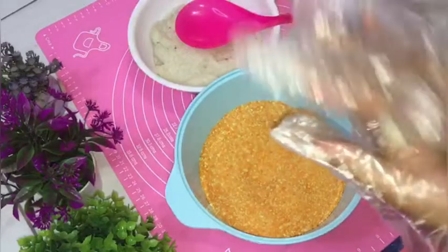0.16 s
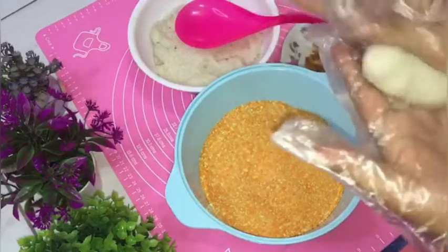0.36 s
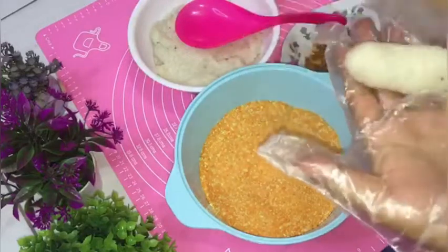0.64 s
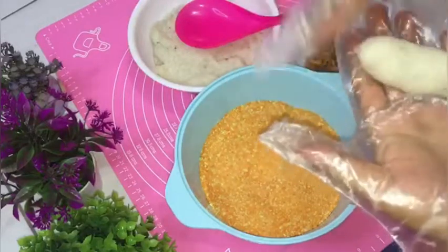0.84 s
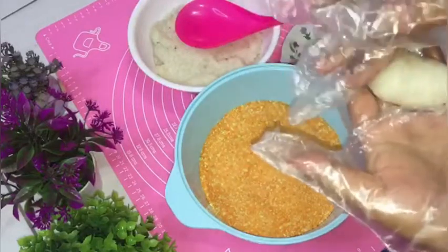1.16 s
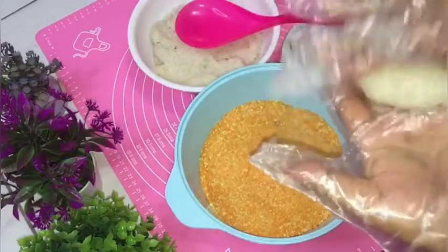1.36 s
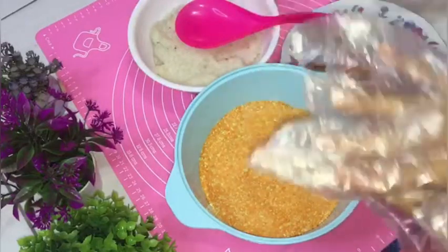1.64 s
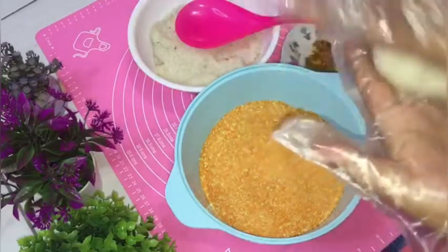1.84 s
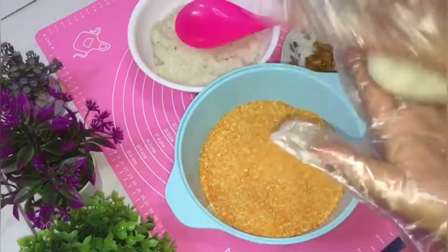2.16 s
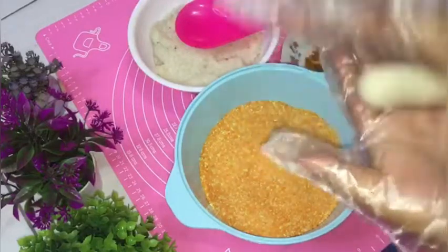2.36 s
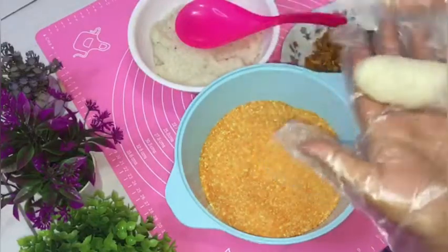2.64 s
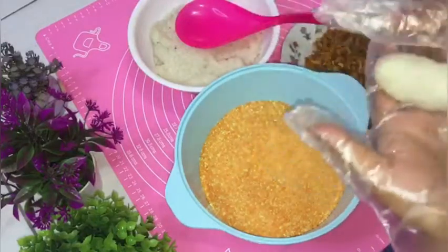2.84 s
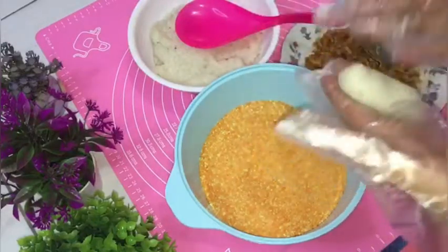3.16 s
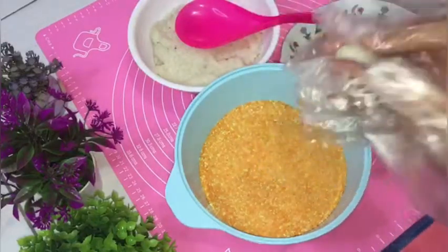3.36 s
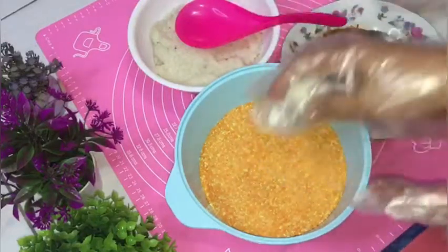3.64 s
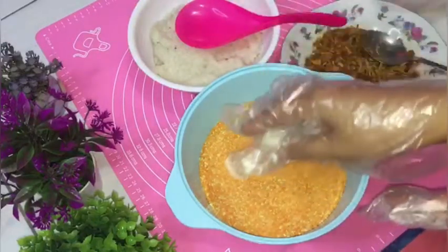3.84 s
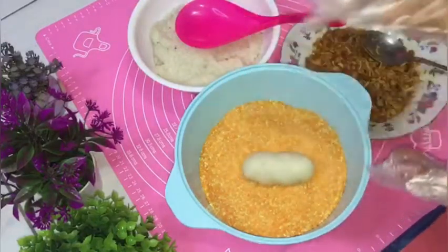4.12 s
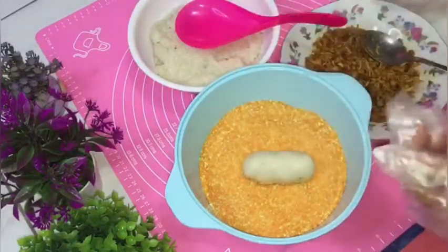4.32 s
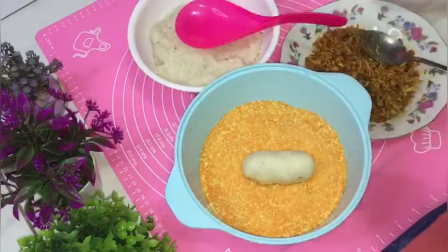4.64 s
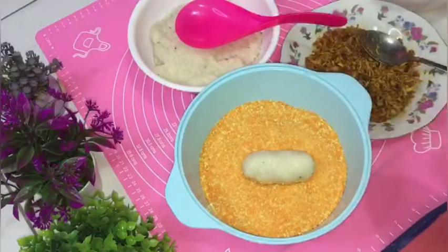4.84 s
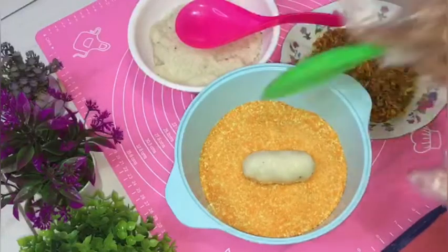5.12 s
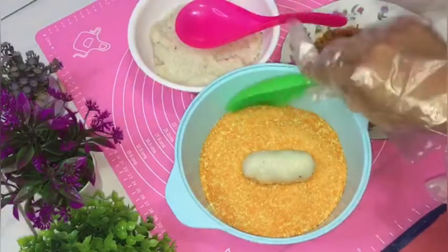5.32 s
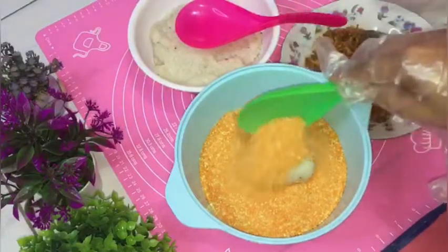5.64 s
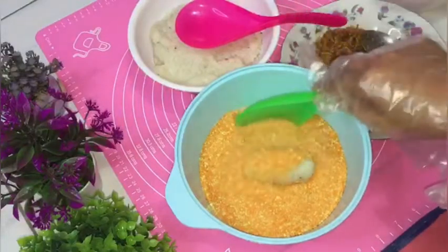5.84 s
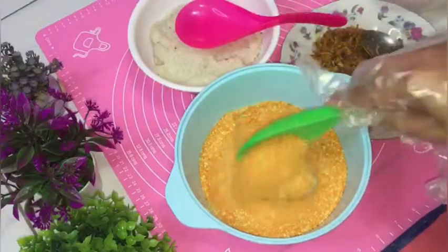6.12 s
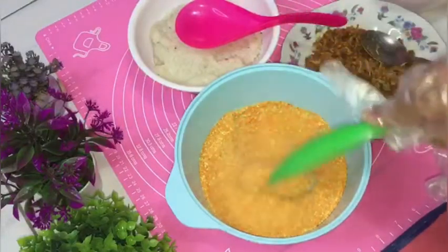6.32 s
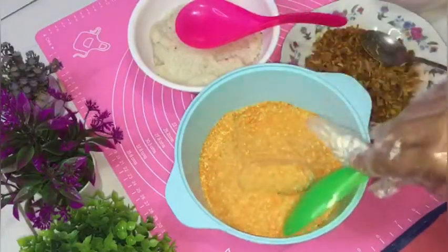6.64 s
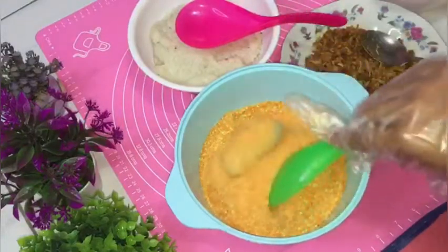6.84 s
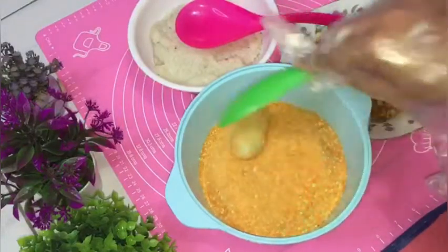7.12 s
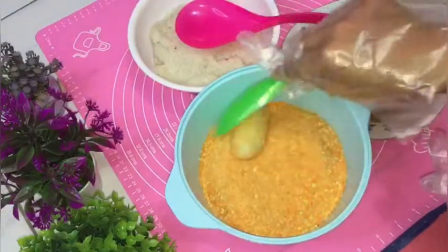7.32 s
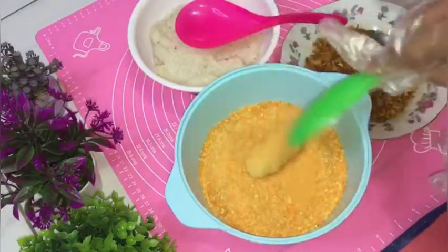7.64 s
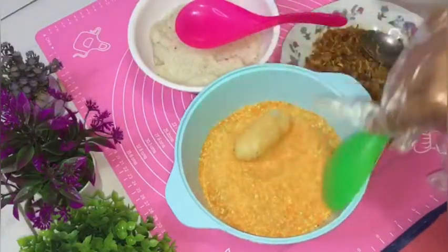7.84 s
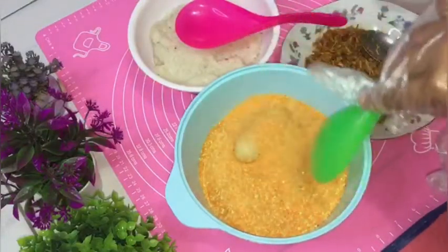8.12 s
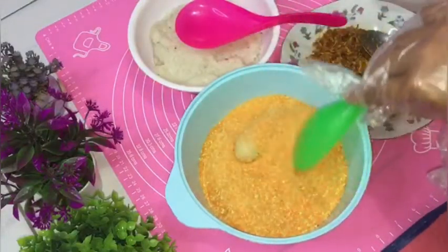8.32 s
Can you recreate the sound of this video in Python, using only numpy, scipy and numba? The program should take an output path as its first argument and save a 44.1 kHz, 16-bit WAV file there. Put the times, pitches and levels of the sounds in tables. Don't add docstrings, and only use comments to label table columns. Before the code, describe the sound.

A close microphone in a small, fairly dry kitchen picks up thin plastic gloves rolling a rice ball. From 0 to 0.7 s the film crackles in quick, dense strokes with sharp dry snaps; it eases into lighter rustling, with a slap near 1.35 and a longer peel at 1.6. Vigorous rubbing returns from 1.7 to 2.9 s, bright on top with soft hollow pats below. Rustles thin after 3.1, with tiny tugs around 3.7 and near quiet at 3.8 to 4.1. Light crinkling resumes from 4.2 to 5.3. A bright spoon knock on the plastic bowl at 5.3 begins gritty dragging through crumbs. Another hard knock comes at 6.6 with a longer rattling scrape, then sparse faint film ticks, a small dig at 7.3, a tight double knock at 7.9 and a light one at 8.25. Faint air, fan and wavering motor hum continue throughout.

```python
import sys
import numpy as np
from scipy import signal
from scipy.fft import rfft, irfft
from scipy.io import wavfile
from scipy.ndimage import map_coordinates
from numba import njit

SR = 44100
rng = np.random.default_rng(int(sys.argv[2]) if len(sys.argv) > 2 else 0)


def gain_from_db(level_db):
    decades = np.asarray(level_db, float) / 20
    return 10 ** decades


def generate_wav(signal):
    frames = np.transpose(np.atleast_2d(signal))
    scaled = np.clip(frames, -1, 1) * 32767
    pcm = np.round(scaled).astype(np.int16)
    wavfile.write(sys.argv[1], SR, pcm)


N = 373968


def gloves():
    # frequency in Hz, level in dB per Hz.
    creases = [(1470, -32), (2500, -3), (4110, -1.5), (4920, -1), (5320, 0.5), (8690, -3), (11200, -2.5),
               (11700, -38), (15200, -35), (22000, -120)]
    broad_folds = [(350, -39), (600, -17.5), (2260, -9), (2800, -10), (3640, -31), (6160, -120)]
    palm_hollow = [(110, -34), (180, 7.5), (242, 4.5), (393, 12), (600, 2.5), (780, -39), (1320, -120)]
    fine_db = rubbing(0, 0)
    folds_db = rubbing(-10, 0.99)
    palms_db = rubbing(-23, 1.2)
    fine = crackle(creases, 2466, 12470, fine_db, per_s=11000,
                   uneven_db=1.2, cycles=9.3, clump_db=0.8, patch_db=2.0)
    folds = crackle(broad_folds, 660, 2570, folds_db, per_s=5000,
                    uneven_db=1.5, cycles=10.1, clump_db=0.6, patch_db=2.7)
    palms = crackle(palm_hollow, 165.4, 726, palms_db, per_s=900,
                    uneven_db=2.2, cycles=12.7, clump_db=1.8, patch_db=3)
    ticks = crackle(creases, 3300, 10000, fine_db - 13.0, per_s=600,
                    uneven_db=3.3, cycles=2.2, clump_db=2.8, patch_db=1.3)
    return fine + folds + palms + ticks


def rubbing(offset_db, follow):
    # time in seconds, creases in dB, hold in seconds, pressure in dB.
    rolls = [(0.026, -23.5, 0.027, -2.5), (0.075, -34, 0.017, 0), (0.145, -27, 0.07, 1),
             (0.29, -25.5, 0.049, -2), (0.36, -31.5, 0.015, -2), (0.435, -26.5, 0.049, -0.5),
             (0.5, -36, 0.012, 7), (0.575, -25, 0.036, 1.5), (0.65, -25, 0.014, 3.5),
             (0.68, -32.5, 0.025, 3.5), (0.945, -30.5, 0.04, 4), (1.412, -28, 0.018, 3.5),
             (1.67, -28.5, 0.029, 2), (1.765, -28, 0.034, 0.5), (1.81, -24.5, 0.031, -2.5),
             (1.92, -29.5, 0.0078, -2.5), (1.94, -25, 0.053, 0.5), (2.085, -20.5, 0.03, -4),
             (2.16, -31.5, 0.03, -2), (2.22, -25, 0.055, 0), (2.3, -34, 0.004, 0), (2.365, -22, 0.069, 0),
             (2.56, -32.5, 0.02, -1), (2.615, -29.5, 0.072, -1.5), (2.77, -25.5, 0.028, 0),
             (2.82, -34, 0.065, -1), (2.978, -28, 0.015, -0.5), (3.035, -41, 0.01, 1),
             (3.058, -28, 0.004, 2.5)]
    shifts = [(0.736, -33.5, 0.037, 0.5), (0.82, -31.5, 0.039, -0.5), (1.046, -35.5, 0.05, 2),
              (1.16, -35.5, 0.12, 2.5), (1.48, -38.5, 0.052, 2.5), (3.107, -34, .12, 1),
              (3.269, -28.5, 0.035, -1), (3.36, -31, 0.049, 1), (3.44, -32.5, 0.11, 0.5),
              (3.598, -38.5, 0.06, -1), (3.84, -56.5, 0.0074, -2), (3.906, -27.5, 0.0067, 3),
              (4.0, -41.5, 0.023, 0.5), (4.125, -46.5, .01, -1), (4.207, -31, 0.08, -4),
              (4.329, -32.5, 0.098, -2.5), (4.47, -32, 0.056, 0), (4.545, -30.5, 0.063, 1.5),
              (4.67, -27, 0.011, 0), (4.72, -33.5, 0.092, 1.5), (4.814, -38, 0.025, 7),
              (4.872, -30, 0.046, 2.5), (4.97, -30, 0.058, -2.5), (5.063, -30.5, 0.04, -0.5),
              (5.14, -29.5, 0.065, -2), (5.247, -34.5, 0.12, -2)]
    slaps = [
        (1.343, -27, 0.019, 4.5),
        (1.577, -25.5, 0.089, 0),
        (2.462, -28, 0.028, 1.5),
        (2.892, -30.5, 0.0039, 3.5),
        (3.702, -38.5, 0.012, -1),
        (3.728, -35, 0.005, -2),
        (3.743, -37.5, 0.0061, 2.5),
        (3.772, -31.5, 0.005, -1.5),
        (3.953, -40, 0.007, -2),
    ]
    power = 0
    # rise, sag and fall in dB per s
    for rows, rates in [(rolls, (307, 6.9, 280)), (shifts, (225, 7.9, 244)), (slaps, (1050, 5.6, 640))]:
        s, db, hold, press = np.transpose(rows)
        power = power + strokes(s, db + offset_db + follow * press, hold, *rates)
    return in_db(power)


def strokes(start_s, peak_db, hold_s, rise, sag, fall):
    t = np.arange(N // 20 + 2) * 20 / SR
    power = np.zeros(len(t))
    for s, db, hold in zip(start_s, peak_db, hold_s):
        since = t - s
        swell_db = rise * np.minimum(since, 0)
        sag_db = sag * np.clip(since, 0, hold)
        fall_db = fall * np.maximum(since - hold, 0)
        power += gain_from_db(2 * (db + swell_db - sag_db - fall_db))
    return np.interp(np.arange(N) / SR, t, power)


def in_db(power):
    return 10 * np.log10(power + 1e-9)


def crackle(spectrum, low_hz, high_hz, level_db, per_s, uneven_db, cycles, clump_db, patch_db):
    density = np.clip(gain_from_db(0.49 * (level_db - level_db.max() + 12.0)), 0.03, 1)
    rate = per_s * density * (level_db > -85)
    at = np.flatnonzero(rng.random(N) < rate / SR)
    place, spread, sign, length = rng.random((N, 4))[at].T
    hz = low_hz * (high_hz / low_hz) ** place
    patch_map = rng.standard_normal((21, N // 2000 + 2))
    patches = map_coordinates(patch_map, [20 * place, at / 2000], order=1)
    size_db = at_hz(spectrum, hz) - uneven_db * np.log(spread + 0.035)
    size_db = size_db + clump_db * drift(26)[at] + patch_db * patches
    size = gain_from_db(size_db) * hz * np.sign(sign - 0.5) / np.sqrt(rate[at])
    out = np.zeros(N)
    add_snaps(out, at, hz, size, cycles * (0.5 + length), SR)
    return gain_from_db(level_db) * out / np.sqrt(np.mean(out[rate > 0] ** 2))


@njit
def add_snaps(out, at, hz, size, cycles, sr):
    for k in range(len(at)):
        w = 2 * np.pi * hz[k] / sr
        r = 10 ** (-3 * hz[k] / (cycles[k] * sr))
        old, new = 0., size[k]
        for i in range(at[k], min(at[k] + int(cycles[k] * sr / hz[k]), len(out))):
            out[i] += new - old
            old, new = new, 2 * r * np.cos(w) * new - r * r * old


def at_hz(points, hz):
    point_hz, point_db = np.transpose(points)
    return np.interp(np.log(np.minimum(hz, 11500)), np.log(point_hz), point_db)


def drift(rate):
    r = np.exp(-80 * np.pi * rate / SR)
    slow = signal.lfilter([1], [1, -2 * r, r * r], rng.standard_normal(N // 40 + 2002))[2000:]
    return np.interp(np.arange(N) / 40, np.arange(len(slow)), rms_one(slow))


def rms_one(x):
    return x / np.sqrt(np.mean(x ** 2) + 1e-20)


def cracks():
    # time in seconds, peak in dB.
    creases_letting_go = [(0.2897, -4), (0.3213, -3), (0.5765, -2), (0.601, -8), (1.604, -3),
                          (1.6375, -3.5), (1.661, -6), (1.835, -5), (2.105, -3), (2.371, -5), (2.77, -4),
                          (2.78, -6), (3.907, -6), (5.7263, -21), (5.772, -25), (6.2335, -12),
                          (6.3392, -16), (7.1836, -23), (7.3108, -11)]
    s, peak_db = np.transpose(creases_letting_go)
    clicks = np.zeros(N)
    clicks[np.round(s * SR).astype(int)] = gain_from_db(peak_db - 11.5)
    hiss = signal.lfilter([1], [1, -gain_from_db(-60 / (0.022 * SR))], clicks) * rng.standard_normal(N)
    return signal.sosfilt(signal.butter(2, 3500, "high", fs=SR, output="sos"), clicks + 0.46 * hiss)


def spikes():
    # time in seconds, peak in dB.
    buckles = [(0.7811, -23.4), (0.8716, -22.9), (1.1367, -24.8), (1.2111, -24.2), (1.5552, -26.2),
               (1.9367, -11.1), (2.303, -12.1), (2.7274, -23.9), (2.9217, -23.3), (3.0319, -19.9),
               (3.3136, -17.4), (3.5434, -19.8), (3.5829, -25.2), (3.7039, -26.3), (3.7291, -26.3),
               (3.7435, -22.9), (3.7722, -21.3), (3.8037, -31.9), (3.9551, -23.5), (4.1223, -32.6),
               (4.3937, -20.2), (4.4637, -21.3), (4.6203, -19.6), (4.6773, -16.2), (4.7797, -19.0),
               (5.3019, -22.5), (5.6664, -43.0), (5.7263, -34.7), (5.7465, -40.7), (5.7718, -35.0),
               (5.7934, -30.9), (6.1303, -34.9), (6.1688, -36.0), (6.2247, -33.3), (6.2336, -21.8),
               (6.2766, -41.9), (6.2976, -40.5), (6.3095, -35.8), (6.34, -29.6), (6.3996, -27.4),
               (6.4591, -29.5), (6.5392, -23.4), (6.7029, -21.1), (6.8763, -25.2), (6.9241, -29.7),
               (6.9688, -27.0), (7.0338, -38.9), (7.0509, -44.7), (7.1219, -44.0), (7.1437, -43.9),
               (7.1873, -39.0), (7.3549, -25.1), (7.7269, -26.3), (7.771, -29.7), (7.7871, -25.5),
               (7.8229, -35.3), (8.0977, -30.5), (8.215, -41.4), (8.3682, -28.7), (8.4122, -35.6)]
    s, peak_db = np.transpose(buckles)
    clicks = np.zeros(N)
    clicks[np.round(s * SR).astype(int)] = gain_from_db(peak_db + 6) * (-1) ** np.arange(len(s))
    return signal.sosfilt(signal.butter(2, 2400, "high", fs=SR, output="sos"), clicks)


def film_snaps():
    # time in seconds, peak
    # in dB, pitch in Hz.
    hand_snaps = [(0.1291, -9, 9150), (0.2887, -13, 10100), (1.1273, -36, 4260), (1.1558, -20, 8770),
                  (1.3421, -20, 3740), (1.5744, -20, 6100), (2.9667, -11.5, 5500), (3.7703, -22, 5750),
                  (4.1165, -27, 6880), (4.1609, -30, 5710), (4.1914, -22, 7100), (4.78, -14, 9500),
                  (4.7785, -18, 2700),
                  (5.7245, -25, 10850), (5.7704, -28, 8800), (5.7922, -33, 6100), (5.665, -41.5, 2330),
                    (6.106, -37, 3560), (6.129, -34, 4600), (6.308, -41, 2250), (6.588, -23, 9940),
                    (6.876, -25, 8500), (6.9213, -25, 2970), (6.924, -25, 9000), (7.146, -39.5, 5500),
                    (7.0922, -41, 5910), (7.513, -32, 2600), (7.771, -29, 6330), (6.128, -26, 11030),
                    (6.225, -28, 5200), (6.155, -33, 5000), (6.2333, -21, 8380), (6.2966, -36, 2800),
                    (6.3375, -21, 10650), (6.362, -37, 4220), (6.3996, -24, 6920), (6.538, -30, 3330),
                    (6.969, -31, 3780), (7.0324, -34, 5840), (7.1204, -43, 5230), (7.1426, -43, 8950),
                    (7.184, -31, 8700), (7.2863, -50, 2285), (7.645, -35, 6450), (7.786, -18, 9200),
                    (8.2737, -40, 2466), (8.367, -33, 3150)]
    return lone(hand_snaps, 19.0, -2.1)


def pats():
    # time in seconds, peak in dB, pitch in Hz.
    presses = [(0.435, -51, 288), (0.646, -29.5, 437), (1.35, -46, 328), (1.62, -31, 360),
               (2.09, -26.5, 311.4), (2.888, -40.5, 316), (4.56, -34, 623), (4.68, -37, 586),
               (4.812, -31.5, 557), (4.885, -33, 620), (5.324, -36.5, 315), (6.567, -32, 343),
               (7.876, -31, 450)]
    return lone(presses, 22.4, -0.38)


def lone(events, cycles, trim_db):
    out = np.zeros(N)
    for s, peak_db, hz in events:
        at = round(s * SR)
        t = np.arange(int(cycles / hz * SR)) / SR
        onset = np.minimum(t * hz / 0.38, 1)
        wave = gain_from_db(peak_db + trim_db - 60 * t * hz / cycles) * np.sin(2 * np.pi * hz * t) * onset
        out[at:at + len(t)] += wave[:N - at]
    return out


def knocks():
    # time in seconds, peak in dB, brightness in dB per octave.
    blows = [
        (5.325, -1, 10.5),
        (5.344, -23, -5),
        (5.808, -35, 3),
        (6.569, -1.5, 5.5),
        (7.311, -42, -5.5),
        (7.871, 1, 6),
        (7.881, -0.5, 6.5),
        (8.251, -12.5, 0.5),
    ]
    # frequency in Hz, level in dB, 60 dB decay in seconds.
    bowl_modes = [(480, -43, 0.022), (820, -10, 0.011), (1560, -12.5, 0.012), (2210, -13, 0.0073),
                  (3940, -26.5, 0.0083), (4300, -48, .006), (5830, -31, 0.004), (7240, -45, .004)]
    s, peak_db, bright_db = np.transpose(blows)
    at = np.round((s - 0.0008) * SR).astype(int)
    scatter_db = rng.normal(0, 0.74, (len(s), len(bowl_modes)))
    out = 0
    for k, (hz, level_db, t60) in enumerate(bowl_modes):
        clicks = np.zeros(N)
        clicks[at] = gain_from_db(peak_db + level_db + bright_db * np.log2(hz / 2000) + scatter_db[:, k])
        out = out + (-1) ** k * ring(clicks, hz, t60)
    out = 0.37 * out + np.roll(out, int(0.000916 * SR))
    return signal.sosfilt(signal.butter(2, [500, 6000], "band", fs=SR, output="sos"), out)


def ring(clicks, hz, t60):
    r, w = gain_from_db(-60 / (t60 * SR)), 2 * np.pi * hz / SR
    return signal.lfilter([0, np.sin(w)], [1, -2 * r * np.cos(w), r * r], clicks + 1e-18)


def spoon():
    # frequency in Hz, level in dB per Hz.
    rattle = [(150, -44), (250, -22), (296, -4.5), (334, -10.5), (619, -10), (674, -8.5), (1000, -5),
              (1440, -0.5), (1730, -3), (2230, -1.5), (3060, -6.5), (4500, -4), (5850, -35), (9900, -120)]
    crumb_grain = [(2060, -27), (3500, 0.5), (9140, -7.5), (10600, 2), (11200, -4), (11700, -32),
                   (15200, -36), (22000, -120)]
    # frequency in Hz, width in Hz, gain in dB.
    wall_modes = [(870, 300, -4.5), (1565, 88, 4), (2240, 65, -10), (2600, 65, -3.5)]
    rim_db = digging(sag=56)
    floor_db = digging(sag=56, floor=0.78)
    crumbs_db = digging(sag=35, crumbs=0.88)
    rim = crackle(rattle, 1690, 3750, rim_db - 2.0, per_s=5000,
                  uneven_db=1.0, cycles=35.0, clump_db=0.46, patch_db=3)
    floor = crackle(rattle, 285, 1458, floor_db - 3.0, per_s=2500,
                    uneven_db=0.87, cycles=42.0, clump_db=0.97, patch_db=0.93)
    crumbs = crackle(crumb_grain, 3770, 10280, crumbs_db, per_s=11000,
                     uneven_db=3.2, cycles=7.2, clump_db=0.61, patch_db=1.8)
    ticks = crackle(crumb_grain, 4000, 8300, crumbs_db - 19.5, per_s=640,
                    uneven_db=1.1, cycles=4.4, clump_db=1.5, patch_db=1.2)
    modes = 0
    for hz, width_hz, gain_db in wall_modes:
        b, a = signal.iirpeak(hz, hz / width_hz, fs=SR)
        modes = modes + gain_from_db(gain_db) * signal.lfilter(b, a, rim + floor)
    return rim + floor + modes + crumbs + ticks


def digging(sag, floor=0, crumbs=0):
    # time in seconds, bowl rim in dB, drag in seconds,
    # bowl floor in relative dB, crumbs in relative dB.
    digs = [(5.344, -31, 0.043, -3, 0), (5.37, -30.5, 0.092, -5.5, 2), (5.806, -40.5, .03, -5, 8),
            (5.829, -37.5, 0.032, -1.5, 1), (6.573, -40, 0.024, 1.5, 0), (6.595, -36.5, 0.34, -3, 5),
            (7.31, -39.5, 0.029, -5, 1), (7.354, -40, 0.03, -6.5, 1), (7.883, -35, 0.12, -0.5, -2),
            (8.03, -44, 0.13, -4.5, -3), (8.255, -44.5, 0.032, 3, -6), (8.285, -44.5, 0.099, 1, 4.5)]
    # time in seconds, bowl rim
    # in dB, hold in seconds, bowl floor in relative dB, crumbs in relative dB.
    grips = [(5.575, -52, 0.039, -11, 2.5), (5.676, -61.5, 0.1, -4, 6), (5.793, -55.5, 0.0036, -22, 13.5),
             (5.906, -40, 0.026, -6, 5), (5.961, -45, 0.026, -7, 2), (6.06, -56, 0.043, -5.5, 2),
             (6.14, -56, 0.017, -24, 9.5), (6.19, -60, 0.01, -17, 17.5), (6.306, -58.5, 0.046, -17, 9),
             (6.391, -52, 0.035, -8, 12.5), (6.464, -49.5, 0.012, -7, 11), (6.54, -42.5, 0.012, -4, 7.5),
             (6.78, -44, 0.035, -7, 2), (6.865, -49.5, .05, -8, 6), (6.98, -54.5, 0.023, -4, 5),
             (7.04, -68, 0.02, -2, 12), (7.095, -68, 0.0086, -5, 13.5), (7.145, -71, 0.014, -6, 16),
             (7.186, -68, .01, -5, 11), (7.232, -70.5, 0.032, -12, 15.5), (7.454, -48.5, 0.025, -8, 4),
             (7.52, -58.5, 0.013, -1, 12), (7.55, -59, .008, -7, 9), (7.6, -61, 0.011, -15, 6),
             (7.661, -50.5, 0.1, -6, 11), (7.814, -59.5, .01, -12, 12), (7.875, -43, 0.0082, -4, 2.5),
             (8.1, -56, 0.0077, -8, 7), (8.14, -61, 0.018, -8, 10), (8.211, -64, 0.0052, -8, 6),
             (8.283, -46, 0.03, -4, -2)]
    power = 0
    for rows, rates in [(digs, (7000, sag, 185)), (grips, (384, 3.7, 280))]:
        s, db, hold, low, high = np.transpose(rows)
        power = power + strokes(s, db + floor * low + crumbs * high, hold, *rates)
    return in_db(power)


def scrapes():
    # time in seconds, level in dB, hold in seconds, pitch in Hz.
    edge_strokes = [(4.792, -36.5, 0.05, 2600), (5.52, -52, 0.11, 2210), (5.896, -44, 0.03, 2500),
                    (5.996, -55, 0.12, 2680), (6.141, -49, 0.022, 2660), (6.584, -42, 0.05, 1990),
                    (6.75, -47.5, 0.077, 2284), (7.338, -44, 0.055, 2430), (7.439, -53.5, 0.05, 2320),
                    (7.887, -44, 0.11, 2150), (8.03, -49, 0.14, 2230)]
    width_hz = 240
    rise, sag, fall = 1300, 43, 370
    noise = rng.standard_normal(N)
    out = 0
    for s, level_db, hold, hz in edge_strokes:
        band = signal.lfilter(*signal.iirpeak(hz, hz / width_hz, fs=SR), noise)
        power = strokes([s], [level_db], [hold], rise, sag, fall)
        out = out + rms_one(band) * np.sqrt(power + 1e-20)
    return out


def thuds():
    # time in seconds, peak in dB, pitch in Hz.
    table_knocks = [
        (1.13, -41, 115),
        (1.17, -44, 129),
        (2.17, -45, 148),
        (3.48, -40.5, 73),
        (5.36, -40, 146.8),
        (5.42, -43, 140),
        (2.09, -34.5, 190),
        (3.06, -40, 204),
        (4.42, -43.5, 230.7),
        (8.4, -44, 149),
    ]
    return lone(table_knocks, 24.6, 2.2)


def kitchen(x):
    t60_s = 0.17
    t = np.arange(int(0.5 * SR)) / SR
    tail = rng.standard_normal(len(t)) * gain_from_db(-60 * t / t60_s) * (t > 0.004)
    tail = signal.lfilter([1], [1, -0.4], tail)
    return signal.fftconvolve(x, tail / np.sqrt(np.sum(tail ** 2)))[:N]


def room_tone():
    # frequency in Hz, level in dB per Hz.
    air_spectrum = [(18, -39), (30, -2), (86, 8), (165, 0), (252, -7.5), (686, -14), (1530, -13.5),
                    (2340, -10.5), (3080, -18.5), (9040, -24), (11900, -14), (15500, -43), (22000, -120)]
    # time in seconds, motor pitch in Hz, motor level in dB, fan tone in dB.
    motor = [(0.0, 68.2, -66, -51.5), (0.3, 74.4, -50.5, -52.5), (0.64, 69, -82, -66),
             (1.05, 81.8, -76, -59), (1.13, 79, -46.5, -49), (1.27, 79.5, -53, -53), (1.5, 80, -73, -62),
             (1.82, 60.6, -61, -53), (2.12, 62.6, -58.5, -55), (3.0, 62.6, -56, -53.5),
             (3.15, 81.1, -76, -56), (3.92, 80.7, -57.5, -57), (5.3, 76, -56.5, -60.5),
             (6.5, 80.9, -65, -61.5), (7.11, 80.2, -52, -56), (7.51, 80.1, -60, -57.5),
             (7.77, 82.4, -40, -55.5), (8.43, 81, -48.5, -62.5)]
    hz = np.fft.rfftfreq(N, 1 / SR)
    air = rms_one(irfft(rfft(rng.standard_normal(N)) * gain_from_db(at_hz(air_spectrum, hz + 1)), N))
    pitch_hz, hum_db, fan_db = in_time(motor)
    hum = np.sqrt(2) * gain_from_db(hum_db + 1.8 * drift(4.8)) * np.sin(2 * np.pi * np.cumsum(pitch_hz) / SR)
    fan = rms_one(ring(rng.standard_normal(N), 155.0, 0.067))
    return gain_from_db(-47 - 7.0) * air + hum + gain_from_db(fan_db - 2.5 + 2.8 * drift(16.0)) * fan


def in_time(rows):
    s, *columns = np.transpose(rows)
    return [np.interp(np.arange(N) / SR, s, c) for c in columns]


def scene():
    near = gloves() + cracks() + film_snaps() + pats() + knocks() + spoon() + thuds()
    reflections = gain_from_db(-16.5) * kitchen(near)
    return (near + reflections + spikes() + scrapes() + room_tone())[None]


def low_pass(x):
    return signal.sosfilt(signal.butter(12, 13060, fs=SR, output="sos"), x)


def record(dry):
    # frequency in Hz, width in Hz, depth from 0 to 1.
    housing_dips = [(4915, 190, 0.95), (10400, 430, 1)]
    for hz, width_hz, depth in housing_dips:
        b, a = signal.iirpeak(hz, hz / width_hz, fs=SR)
        dry = dry - np.clip(depth, 0, 0.55) * signal.lfilter(b, a, dry)
    dry = signal.sosfilt(signal.butter(3, 42, "high", fs=SR, output="sos"), dry)
    dry = signal.sosfilt(signal.cheby1(8, 0.5, 11900, fs=SR, output="sos"), dry)
    dry = signal.sosfilt(signal.ellip(12, 0.5, 60, 12400, fs=SR, output="sos"), dry)
    return low_pass(dry)


dry = scene()
out = record(dry)
generate_wav(out)
```